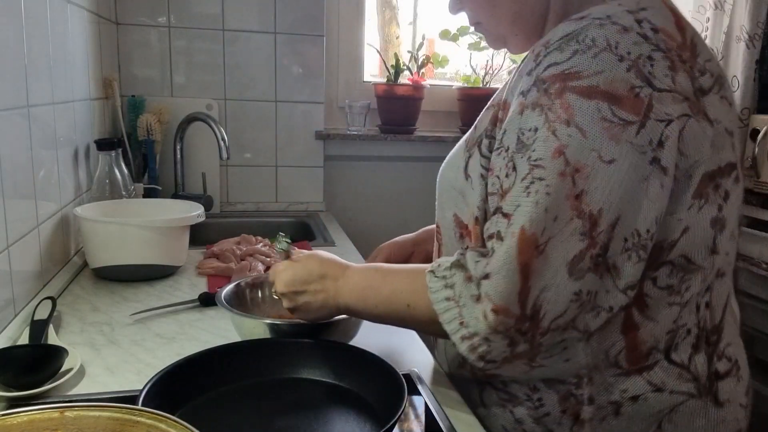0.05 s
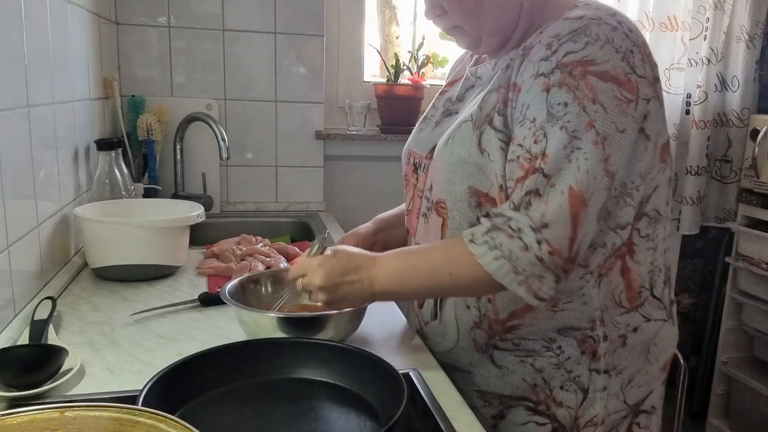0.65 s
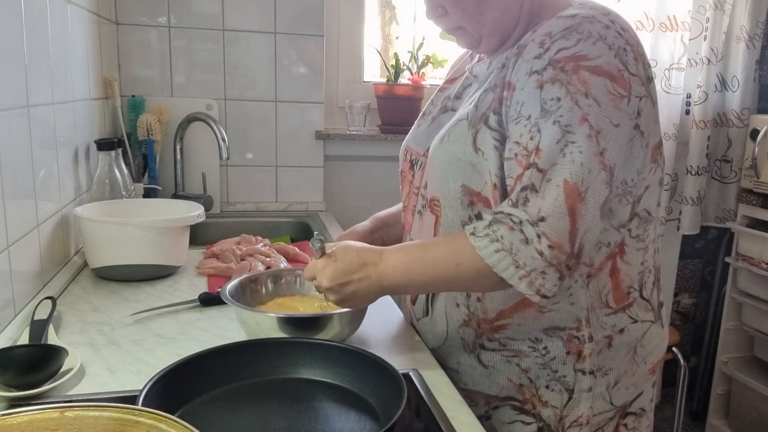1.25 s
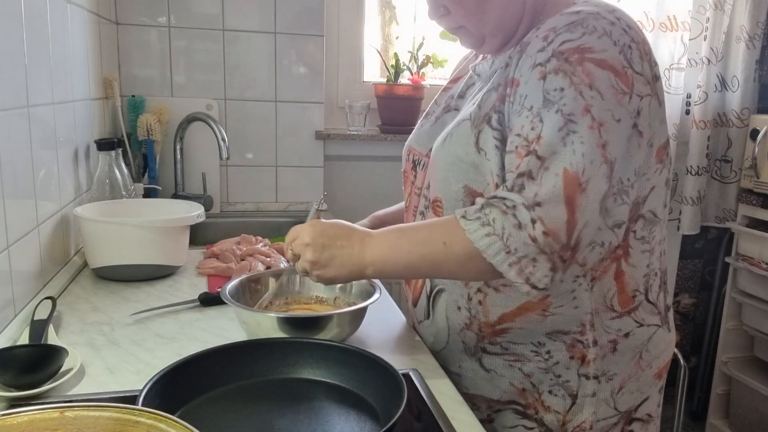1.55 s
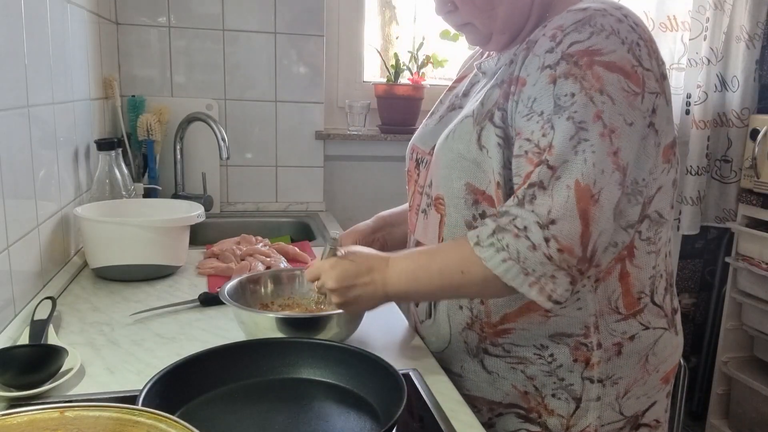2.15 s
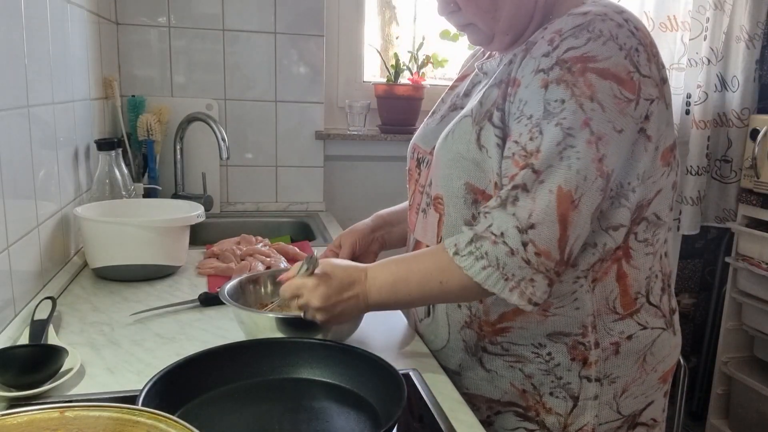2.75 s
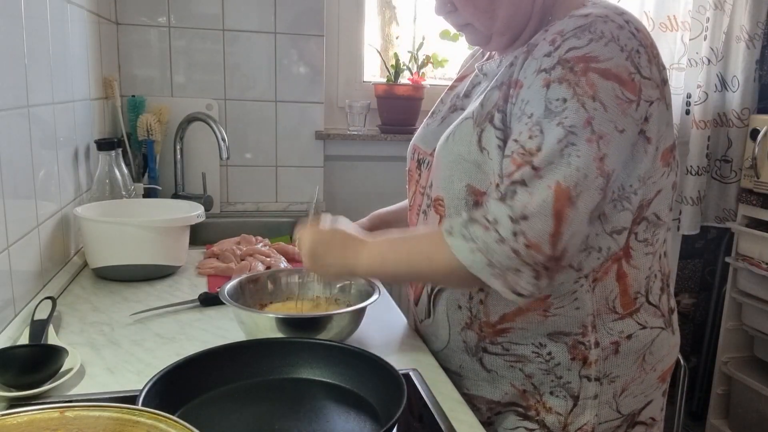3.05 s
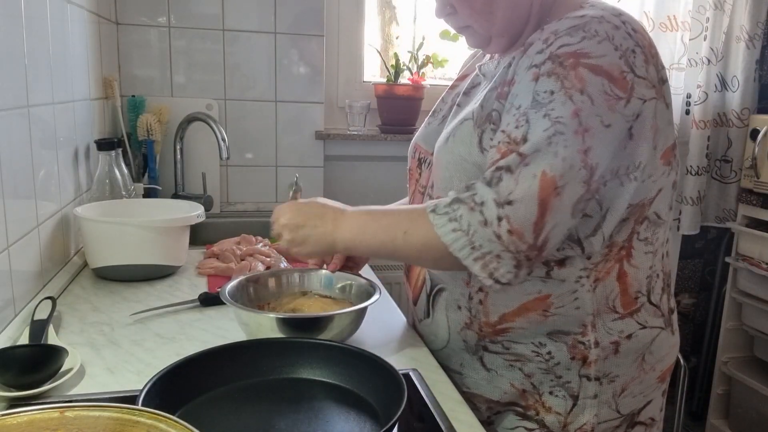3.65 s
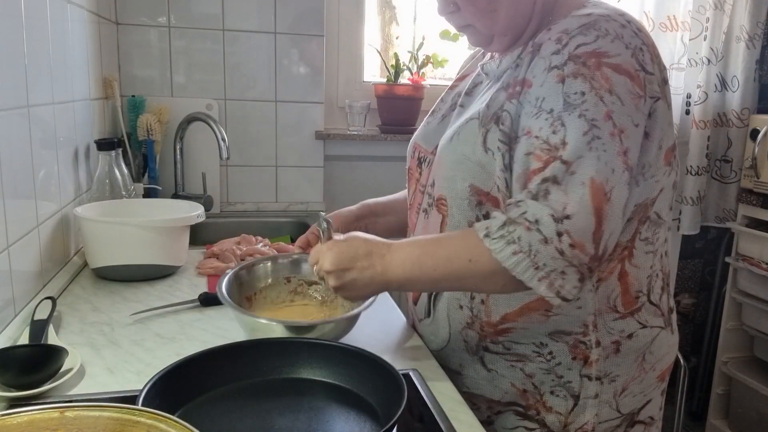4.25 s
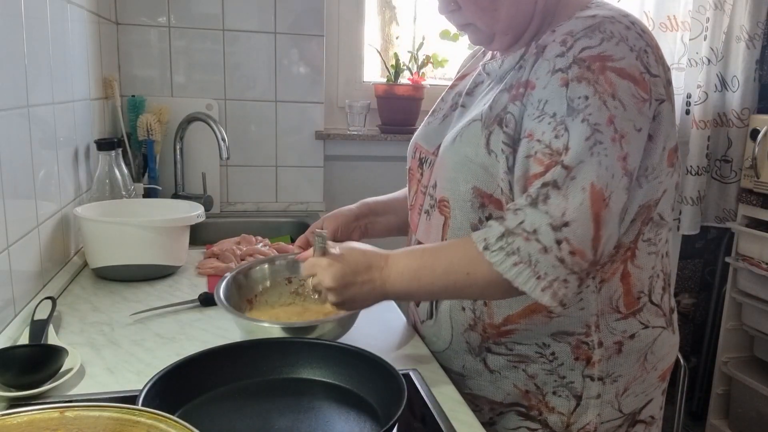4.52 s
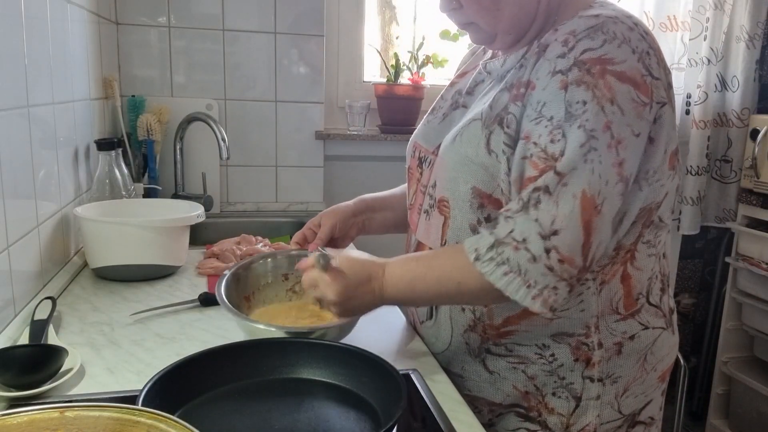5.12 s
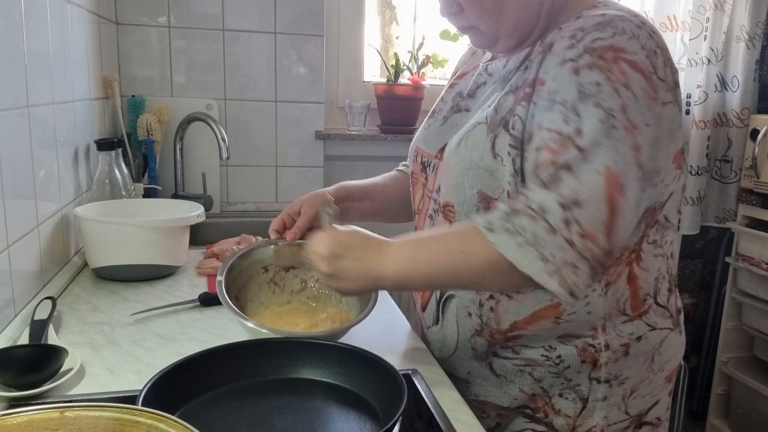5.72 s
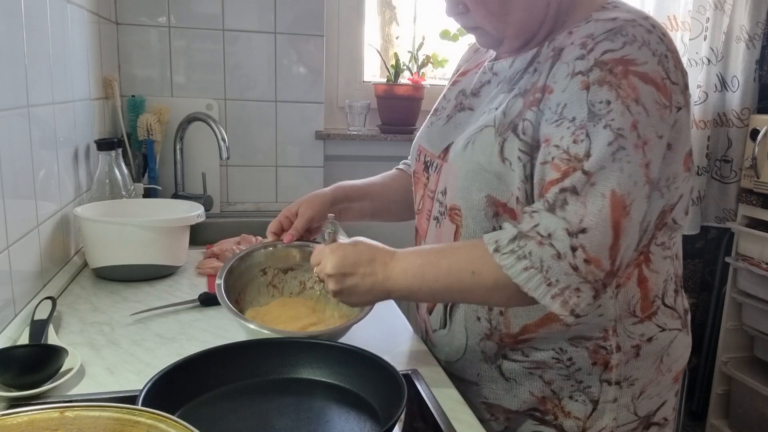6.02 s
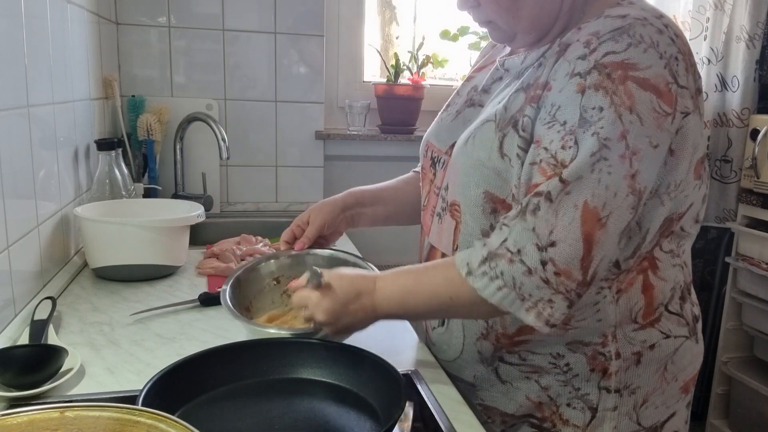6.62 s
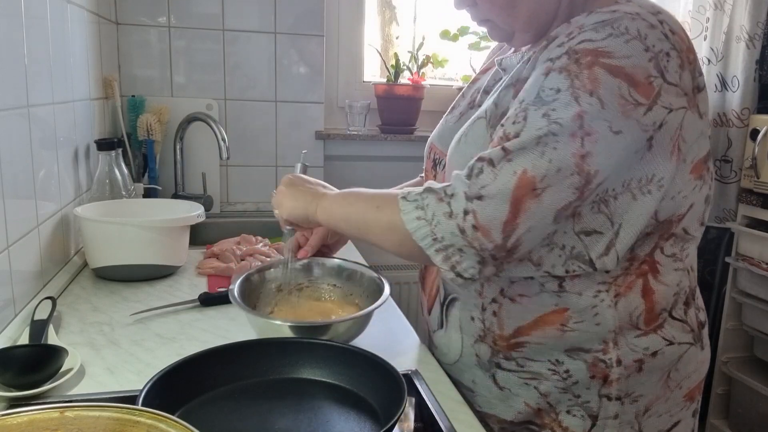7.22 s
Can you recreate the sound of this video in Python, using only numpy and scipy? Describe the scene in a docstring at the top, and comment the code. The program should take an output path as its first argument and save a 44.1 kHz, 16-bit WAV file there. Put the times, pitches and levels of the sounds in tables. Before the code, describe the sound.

A wire whisk beats batter in a steel bowl, with quick metallic clicking and rattling, wet swishing and short pauses.

```python
"""Whisking batter in a steel bowl

A wire whisk beats thin batter in a small tiled kitchen: gently, then hard, with short pauses.
Each stroke clatters on the wall, ringing the damped bowl and the wires. The wires swish through
the batter and twang when clear of it. The bowl rocks on the worktop. A few early plops and a hollow
knock of the bowl give way to short tones near 1 kHz as hard strokes ring the tilted bowl.
The tiles return the sound to a phone about a metre away."""
import sys
import numpy as np
from scipy import signal
from scipy.fft import rfft, irfft
from scipy.io import wavfile
from scipy.ndimage import uniform_filter1d

SR = 44100
rng = np.random.default_rng(int(sys.argv[2]) if len(sys.argv) > 2 else 0)


def store_wav(level_fs):
    """Save 16-bit WAV to argv[1]."""
    pcm = np.round(np.clip(np.atleast_2d(level_fs), -1, 1) * 32767)
    wavfile.write(sys.argv[1], SR, pcm.T.astype(np.int16))


N = 320607
T = np.arange(N) / SR

# whisk strokes, bright on bare steel, duller through batter:
# t/s, level/dB, brightness (wires over wall)/dB, clink f/Hz, approach/s, clatter decay/s
STROKES = [(0.001, -41, 1, 6340, 0.013, 0.0027), (0.124, -36, -5.5, 2840, 0.0055, 0.0089),
           (0.33, -28.5, 6, 3700, 0.0078, 0.014), (0.564, -30, 7, 7630, .007, 0.0092),
           (0.684, -49, -3, 7510, 0.0057, 0.029), (0.82, -29, 9, 3940, 0.0049, .007),
           (0.93, -34, 5, 2690, 0.033, 0.016), (1.03, -39.5, -5, 2920, 0.0074, 0.0075),
           (1.197, -32, 5, 3720, 0.02, 0.01), (1.358, -54, 46.5, 7480, 0.017, 0.034),
           (1.425, -40.5, 12, 7200, 0.024, 0.0028), (1.584, -42.5, 9, 7130, 0.021, 0.033),
           (1.673, -42.5, 0.5, 2880, .011, 0.0052), (1.792, -31.5, 5.5, 7200, .006, 0.019),
           (1.936, -40, 5.5, 5000, 0.025, 0.0097), (2.04, -24, 10, 3030, .009, 0.015),
           (2.16, -25, 3, 4170, 0.025, 0.0075), (2.29, -28, 4, 4670, 0.009, 0.0037),
           (2.394, -32, 1.5, 7160, 0.034, 0.014), (2.496, -23, 4, 4700, 0.0032, 0.0012),
           (2.606, -35, 4.5, 5150, 0.0044, .013), (2.702, -26, 9.5, 1400, 0.0057, 0.0041),
           (2.809, -35, 0, 3550, .006, 0.019), (2.868, -40, 3, 3020, .005, 0.004),
           (2.923, -39, 5, 3710, .005, 0.06), (3.105, -42, 2, 1950, .004, 0.018),
           (3.136, -42.5, 11, 2030, .008, 0.02), (3.229, -37, 6, 7200, 0.011, 0.0068),
           (3.347, -53.5, 27, 7600, .005, 0.015), (3.408, -47.5, 8.5, 7400, .006, 0.04),
           (3.498, -37.5, 11.5, 7800, 0.018, 0.011), (3.606, -42, 16, 7200, .009, 0.024),
           (3.668, -36, 8.5, 5500, .006, 0.023), (3.771, -41.5, 9.5, 4960, 0.039, 0.0092),
           (3.954, -30, 5, 7030, .005, 0.012), (3.986, -31.5, -3.5, 7300, 0.0047, .011),
           (4.025, -33.5, -0.5, 3350, .006, 0.011), (4.157, -23.5, 10.5, 7070, 0.0057, 0.011),
           (4.217, -29.5, 6, 5440, 0.0043, .006), (4.339, -20.5, 13, 7070, 0.0049, 0.0073),
           (4.411, -25, -2, 3460, 0.045, 0.013), (4.536, -20.5, 7.5, 4180, 0.0026, 0.0083),
           (4.616, -28, -2.5, 3540, 0.039, 0.0022), (4.737, -21.5, 2, 4800, 0.0046, 0.013),
           (4.809, -24, 5.5, 3170, 0.01, 0.0072), (4.939, -19.5, -1, 7820, 0.0063, 0.0048),
           (5.016, -23, 6.5, 1840, .003, 0.0059), (5.144, -25, 0, 2040, 0.009, 0.003),
           (5.206, -23.5, 3, 7330, 0.015, 0.0024), (5.466, -29, 9.5, 1870, .002, 0.024),
           (5.702, -44, 9.5, 7700, 0.042, 0.04), (5.886, -22, 9, 7300, 0.0048, 0.0051),
           (6.007, -38.5, 3, 2800, 0.018, 0.013), (6.146, -26, 8, 6100, 0.0072, 0.0096),
           (6.218, -25.5, 4, 3300, 0.02, 0.0045), (6.352, -22, 11.5, 5970, 0.0055, 0.0079),
           (6.396, -28.5, -6, 2230, 0.0066, 0.0089), (6.451, -21.5, 3, 2330, 0.022, 0.0064),
           (6.561, -22, -1, 7060, 0.0078, 0.011), (6.618, -27.5, -3, 2830, .004, 0.018),
           (6.671, -22, -1, 3420, 0.018, 0.009), (6.769, -28, -2.5, 3520, 0.0055, .0055),
           (6.836, -31.5, 2.5, 5030, 0.0066, 0.011), (6.886, -23.5, 2.5, 7130, 0.04, 0.01),
           (7.041, -32.5, 8.5, 7200, 0.02, 0.016), (7.144, -36.5, 19.5, 7800, 0.009, .012)]
# band edges of a stroke's parts (base, wall, rim, wires, bare tick): f/Hz
PART_EDGES_HZ = [280, 800, 2300, 5200, 8200, 17000]
# share of each part: level in a medium stroke/dB, brightness slope/(dB/dB), strength slope/(dB/dB)
PART_BALANCE = [(-16.5, -0.1331, -0.18), (-0.5, -.5, 0.1262), (-1, 0.0917, 0.2), (-2, .5, 0.26),
                (-9.5, 0.37, 0.06)]
# modes of bowl and wires: f/Hz, level/dB, t60/s
STEEL_MODES = [(685, -19, 0.087), (971, -18, 0.049), (1034, 5, 0.045), (1219, -5, 0.14), (1366, 2.5, 0.076),
               (1481, -13.5, 0.36), (1550, -37, 0.04), (1824, -9.5, 0.13), (1950, 10.5, 0.045),
               (2200, -20.5, 0.44), (2380, -45, .2), (3030, -0.5, 0.034), (3050, 2.5, 0.15),
               (3765, 0, 0.14), (3970, -16.5, 0.051), (4020, -8, 0.24), (4800, 12.5, 0.02),
               (5660, 0, 0.052), (5230, 9, 0.079), (6450, -33, 0.14), (6680, 0, 0.1), (7275, 6, 0.035),
               (7240, -7, 0.036), (7200, -17, 0.067), (7810, -9.5, 0.13)]
# spectrum of steel on steel: f/Hz, level/dB
CONTACT_SPECTRUM = [(200, 6), (270, -13.5), (320, -8), (450, -9.5), (600, -4.5), (816, -8.5), (1000, -9.5),
                    (1130, -9.5), (1340, -4), (1900, -10.5), (2600, -7.5), (3300, -4), (5500, -12),
                    (7400, -7.5), (8900, -16.5), (13500, -13)]
# swish of wires in batter: t/s, level/dB
SWISH_LEVEL = [(0.0, -50.5), (1.27, -44.5), (1.64, -60.5), (2.21, -45.5), (2.73, -46), (3.24, -60.5),
               (3.64, -48.5), (3.81, -78), (4.03, -54), (4.15, -56), (4.39, -40.5), (5.1, -56),
               (5.3, -54.5), (5.93, -64), (6.54, -43.5), (6.78, -41), (7.15, -49), (7.27, -54)]
# spectrum of the swish: f/Hz, level/dB
SWISH_SPECTRUM = [(150, -12), (240, -47), (305, 2), (440, -13), (700, -1.5), (1250, -1), (1800, -16),
                  (3000, 2.5), (4500, -4.5), (7200, 3.5), (9500, -11.5), (16000, -16.5)]
# wire loops shivering clear of the batter: t/s, level/dB
TWANGS = [(0.0, -46.5), (1.818, -35), (3.132, -45), (4.16, -28.5), (4.221, -34.5), (5.47, -30.5),
          (5.521, -40), (5.891, -30)]
# modes of the free loops: f/Hz, level/dB, t60/s
LOOP_MODES = [(5700, -2, .09), (5640, -7, .08), (5800, 8, 0.11), (5900, 11, 0.055), (6200, -14, .07),
              (6900, 10, 0.085), (6700, 0, .06), (6830, 1, 0.13), (7500, 2.5, 0.13)]
# modes of bowl base, worktop and cupboard: f/Hz, width/Hz, level/dB
BASE_MODES = [(305, 30, -0.68), (470, 143, 0.73)]
WORKTOP_MODES = [(113.3, 9.2, -6), (136.3, 6.5, 3.5), (163.9, 22, 2.5), (200.5, 6.2, -5)]
CUPBOARD_MODES = [(58, 14, -16), (87, 50, 8.5), (305, 25, -1.5)]
# bowl bearing on the worktop, firmest when tipped: t/s, drumming level in a medium stroke/dB
BEARING = [(0, -62), (0.6, -77.5), (1.0, -56.5), (1.7, -68.5), (2.9, -60.5), (3.85, -63), (4.0, -51.5),
           (5.3, -55), (5.7, -44.5), (6.0, -53), (6.9, -54.5), (7.27, -60)]
# bowl tipping and thumping down: t/s, cupboard boom level/dB
THUMPS = [(2.07, -50), (2.41, -52), (2.61, -62), (3.02, -52.5), (3.65, -66), (4.04, -57), (4.22, -46),
          (4.39, -54), (4.76, -55), (4.95, -51), (6.2, -59), (6.9, -51)]
# still kitchen air: f/Hz, level/dB
HUSH_SPECTRUM = [(25, -28), (50, -20), (90, 1.5), (160, -1), (260, -12), (1000, -48), (3000, -14.5),
                 (7000, -15), (9000, -32), (16000, -24)]
# early plops; a low, hollow knock of the bowl (two rows at 3.02 s); from 4.9 s, tones near 1 kHz
# as hard strokes ring the tilted bowl: t/s, f/Hz, level/dB, t60/s
SHORT_TONES = [(0.833, 903, -32.5, 0.16), (1.515, 1218, -42, 0.11), (3.025, 697, -39, 0.093),
               (3.024, 305, -48, 0.33), (3.14, 1970, -40, 0.18), (3.542, 1950, -21.5, 0.028),
               (4.945, 906, -29, 0.095), (5.028, 1318, -12, 0.058), (5.148, 978, -10.5, 0.051),
               (6.572, 960, -32.5, 0.21), (6.893, 1008, -27, 0.15)]
# kitchen reverberation: f/Hz, t60/s
ROOM_T60 = [(150, 0.087), (1000, 0.44), (4000, 0.23), (7500, 0.21), (15000, 0.21)]

MEDIUM_STROKE_DB = -30
TIPPED_S, FLAT_BOOST_DB = 3.9, 2.5  # until tipped, the bowl stands flat and its base is worked harder


def undb(db):
    """Decibels to gain."""
    return 10 ** (np.asarray(db) / 20)


def unit(x):
    """Scale to rms 1."""
    return x / np.sqrt(np.mean(x ** 2) + 1e-20)


def fade(t, t60_s):
    """Exponential decay, 60 dB down at t60_s."""
    return np.exp(-np.log(1000) * t / t60_s)


def on_log_axis(hz, points):
    """Interpolate (f/Hz, value) points over log frequency."""
    f, value = np.transpose(points)
    return np.interp(np.log(hz + 1), np.log(f), value)


def curve(points):
    """Interpolate (t/s, value) points at every sample."""
    return np.interp(T, *np.transpose(points))


def colour(x, spectrum):
    """Filter by a (f/Hz, level/dB) spectrum."""
    n = x.shape[-1]
    hz = np.arange(n // 2 + 1) * SR / n
    return irfft(rfft(x) * undb(on_log_axis(hz, spectrum)), n)


def bandpass(x, lo_hz, hi_hz, order=3):
    """Butterworth band-pass."""
    sos = signal.butter(order, [lo_hz, min(hi_hz, SR / 2 - 1)], "band", fs=SR, output="sos")
    return signal.sosfilt(sos, x)


def resonate(x, hz, width_hz):
    """One resonance, unity gain at its peak."""
    return signal.lfilter(*signal.iirpeak(hz, hz / width_hz, fs=SR), x)


def convolve(x, response):
    """Convolve per channel, keeping the length of x."""
    return signal.fftconvolve(x, response, axes=1)[:, :x.shape[1]]


def add(out, start_s, sound):
    """Mix a sound in at start_s."""
    i = int(start_s * SR)
    sound = sound[..., max(-i, 0):N - i]
    out[..., max(i, 0):max(i, 0) + sound.shape[-1]] += sound


def ports(direct, diffuse, diffuse_share):
    """Two microphone ports: direct sound reaches the left 4 samples early; the rest differs per port."""
    share = np.clip(diffuse_share, 0, 1)
    return np.sqrt(1 - share) * np.array([direct, np.roll(direct, 4)]) + np.sqrt(share) * diffuse


def kitchen(wet_db=-2.5, first_echo_s=0.0015, build_s=0.00057, size=16384):
    """Room response: straight path, then a dense tail from tiles and cupboards, longest in the mids."""
    t, tail = np.arange(size) / SR, 0
    for hz in 125 * 2. ** np.arange(8):
        noise = bandpass(rng.standard_normal((3, size)), hz / np.sqrt(2), hz * np.sqrt(2))
        tail = tail + ports(noise[0], noise[1:], hz / 2500) * fade(t, on_log_axis(hz, ROOM_T60))
    onset = 1 - np.exp(-np.maximum(t - first_echo_s, 0) / build_s)
    return (t == 0) + undb(wet_db) * unit(tail * onset) / np.sqrt(size)


def clatter(t, approach_s, decay_s, contacts_per_s=2200, scatter_db=5, brush_db=-13):
    """Contact force: leading wires brush the wall, the whisk lands at t = 0, then bounces die away."""
    contacts = rng.random(len(t)) < contacts_per_s / SR
    contact_db = scatter_db * np.clip(rng.standard_normal(len(t)), -2, 1.5)
    force = contacts * undb(contact_db) * rng.choice([-1, 1], len(t))
    force[np.argmin(abs(t))] = 1.7  # landing; a typical bounce is 1
    brush = undb(brush_db) * np.exp(-abs(t) / approach_s)
    return force * np.where(t < 0, brush, np.exp(-abs(t) / decay_s))


def bowl_wall(t, force, t60_s=0.088, crack_db=-1):
    """Dense damped sheet modes, plus the treble crack of the bare contacts."""
    # hits on new spots add in energy; hits on one spot ring the same modes again
    energy = signal.lfilter([1], [1, -fade(1 / SR, t60_s) ** 2], force ** 2)
    scattered = rng.standard_normal((3, len(t))) * np.sqrt(energy)
    spot_size = len(t) // 4
    same_spot = rng.standard_normal((3, spot_size)) * fade(t[:spot_size], t60_s)
    sheet = scattered + convolve(force[None], same_spot)
    crack = undb(crack_db) * np.std(sheet) * unit(np.gradient(force))
    return ports(sheet[0] + crack, sheet[1:], 0.95)


def whisk(ring_db=-19.5, clink_db=3, detune=0.0057, gain_db=-7, pan_db=0.1, lead_s=0.02, size=16384):
    """Each clatter drives the wall and the steel modes; strength and brightness set the band balance."""
    out, t, lead = np.zeros((2, N)), np.arange(size) / SR, round(lead_s * SR)
    mode_hz = np.transpose(STEEL_MODES)[0]
    modes = np.array([undb(db) * fade(t, t60_s) * np.exp(2j * np.pi * hz * t)
                      for hz, db, t60_s in STEEL_MODES])
    phase_spread = np.clip(mode_hz / 5000 - .15, 0, 1)  # high modes reach each port in their own phase
    radiation = np.exp(2j * np.pi * rng.random((2, len(modes))) * phase_spread)
    rooms = [kitchen() for _ in range(10)]  # arm and bowl move, so the echoes vary
    medium_db, bright_slope, strength_slope = np.transpose(PART_BALANCE)
    for k, (start_s, stroke_db, bright_db, clink_hz, approach_s, decay_s) in enumerate(STROKES):
        force = clatter(t - lead_s, approach_s, decay_s)
        wall = bowl_wall(t, force)
        mode_gains = 1 + 0.41 * rng.standard_normal(len(modes))
        ring = (radiation * mode_gains @ modes).imag
        sloshed_t = t * (1 + detune * rng.standard_normal())  # moving batter loads the wall
        ring = np.array([np.interp(sloshed_t, t, channel) for channel in ring])
        hit = colour(wall + undb(ring_db) * convolve(force[None], ring), CONTACT_SPECTRUM)

        parts = np.array([bandpass(hit, lo, hi) for lo, hi in zip(PART_EDGES_HZ, PART_EDGES_HZ[1:])])
        parts[0] += 2 * parts[0].mean(axis=0)  # long waves reach both ports nearly alike
        attack_rms = np.sqrt(np.mean(parts[..., lead:2 * lead] ** 2, axis=(1, 2)))
        part_db = medium_db + bright_slope * bright_db + strength_slope * (stroke_db - MEDIUM_STROKE_DB)
        part_db[0] += FLAT_BOOST_DB * (start_s < TIPPED_S)
        balanced = np.tensordot(undb(part_db) / attack_rms, parts, axes=1)

        sound = convolve(balanced, rooms[k % len(rooms)])
        sound = sound + undb(clink_db) * resonate(sound, clink_hz, width_hz=210)
        add(out, start_s - lead_s, sound * undb(stroke_db + gain_db + np.array([[pan_db], [-pan_db]])))
    return out


def batter(pops_per_s=900, scatter_db=2, grain_t60_s=0.019, stick_db=4, sticks_per_s=35,
           bowl_db=-12, gain_db=-2, loops=4, size=1500):
    """Each wire loop sticks and tears free in the batter: wet crackle that faintly rings the bowl."""
    t, crackle = np.arange(size) / SR, 0
    for _ in range(loops):
        pops = rng.random(N) < pops_per_s / SR / loops
        pops = pops * undb(scatter_db * np.minimum(rng.exponential(size=N), 4))
        sticking = np.interp(T * sticks_per_s, np.arange(1000), rng.standard_normal(1000))
        pops = pops * undb(stick_db * np.clip(sticking, -2, 2))
        grain = rng.standard_normal((3, size)) * fade(t, grain_t60_s)
        grain_in_room = convolve(kitchen(), ports(grain[0], grain[1:], 0.9))
        crackle = crackle + convolve(pops[None], grain_in_room)
    bowl = sum(undb(db) * resonate(crackle, hz, width_hz=40) for hz, db, _ in STEEL_MODES)
    swish = colour(unit(crackle) + undb(bowl_db) * unit(bowl), SWISH_SPECTRUM)
    return unit(swish) * undb(curve(SWISH_LEVEL) + gain_db)


def twangs(detune=0.00785, gain_db=-2, lead_s=0.01, size=16384):
    """Free wire loops knock together and ring on, slightly retuned each time."""
    out, t = np.zeros((2, N)), np.arange(size) / SR
    for start_s, twang_db in TWANGS:
        ring = 0
        for hz, db, t60_s in LOOP_MODES:
            detuned_hz = hz * (1 + detune * rng.standard_normal())
            ring = ring + undb(db) * fade(t, t60_s) * np.sin(2 * np.pi * detuned_hz * t)
        force = clatter(t - lead_s, approach_s=0.007, decay_s=0.0095)
        sound = convolve(convolve(force[None], ring[None]), kitchen())
        add(out, start_s - lead_s, sound / np.std(sound[:, :size // 10]) * undb(twang_db + gain_db))
    return out


def swells(events, rise_s, fall_s, size=16384):
    """Envelope of (t/s, level/dB) pushes that rise, decay and add in energy."""
    power, t = np.zeros(N), np.arange(size) / SR
    shape = np.minimum(t / rise_s, 1) * np.exp(-np.maximum(t - rise_s, 0) / fall_s)
    for start_s, db in events:
        add(power, start_s, (undb(db) * shape) ** 2)
    return np.sqrt(power)


def drumming(modes, envelope, side_db=-17, gain_db=0):
    """Low panel modes driven by a random force."""
    force = rng.standard_normal((2, N))
    mid, side = unit(sum(undb(db) * bandpass(force, hz - width_hz / 2, hz + width_hz / 2, order=2)
                         for hz, width_hz, db in modes))
    return (mid + undb(side_db) * side * np.array([[1], [-1]])) * envelope * undb(gain_db)


def rocking_bowl(push_slope=0.6, hand_weight_db=-14, worktop_thump_db=-8, cupboard_rest_db=-69.5):
    """Strokes push the bowl's base against the worktop; when it thumps down, the cupboard booms too."""
    push_events = [(start_s, push_slope * (db - MEDIUM_STROKE_DB)) for start_s, db, *_ in STROKES]
    pushes = swells(push_events, rise_s=0.012, fall_s=0.062)
    thumps = swells(THUMPS, rise_s=0.019, fall_s=0.036)
    bearing = undb(curve(BEARING)) * np.hypot(pushes, undb(hand_weight_db))
    base = drumming(BASE_MODES, pushes * undb(FLAT_BOOST_DB * (T < TIPPED_S)), side_db=-4.5, gain_db=-60)
    worktop = drumming(WORKTOP_MODES, np.hypot(bearing, undb(worktop_thump_db) * thumps))
    cupboard = drumming(CUPBOARD_MODES, np.hypot(thumps, undb(cupboard_rest_db)), gain_db=0.5)
    return base + worktop + cupboard


def hush(level_db=-69):
    """Faint steady room noise."""
    noise = rng.standard_normal((3, N))
    return unit(colour(ports(noise[0], noise[1:], 0.14), HUSH_SPECTRUM)) * undb(level_db)


def short_tones(glide_per_s=0.053, rise_s=0.0052, wobble=0.027, size=8000):
    """Plops, a hollow bowl knock and rings of the tilted bowl: damped tones, wavering, barely rising."""
    out, t = np.zeros(N), np.arange(size) / SR
    for start_s, hz, db, t60_s in SHORT_TONES:
        waver = unit(uniform_filter1d(rng.standard_normal(size), 130))
        phase = 2 * np.pi * np.cumsum(hz * (1 + glide_per_s * t + wobble * waver)) / SR
        envelope = fade(t, t60_s) * (1 - np.exp(-t / rise_s))
        add(out, start_s, undb(db) * envelope * np.sin(phase))
    return np.array([out, out])


def scene():
    """All sources in the kitchen; the short tones sound closer and drier."""
    beating = whisk() + batter()
    close_tones = convolve(short_tones(), kitchen(wet_db=-9.5))
    return beating + close_tones + rocking_bowl() + hush() + twangs()


def record(dry):
    """The phone cuts the treble above 16 kHz."""
    return signal.sosfilt(signal.ellip(10, .2, 70, 16000, fs=SR, output="sos"), dry)


dry = scene()
out = record(dry)
store_wav(out)
```